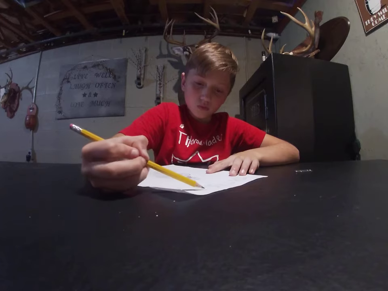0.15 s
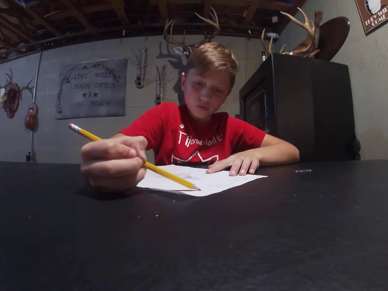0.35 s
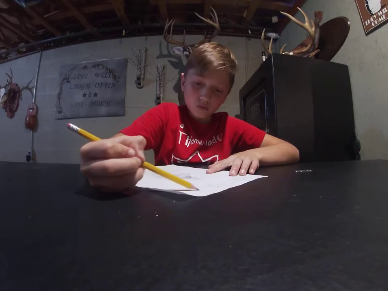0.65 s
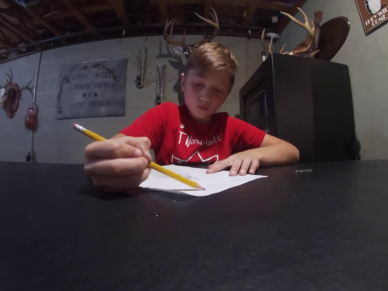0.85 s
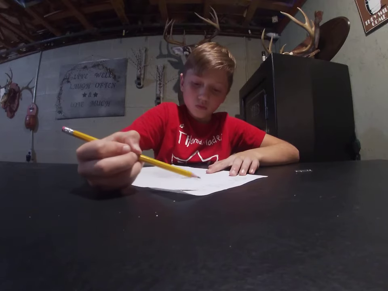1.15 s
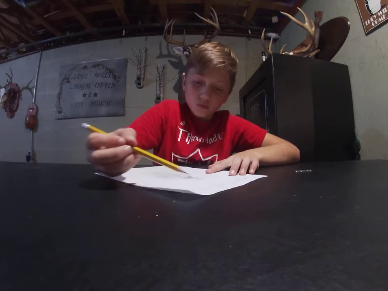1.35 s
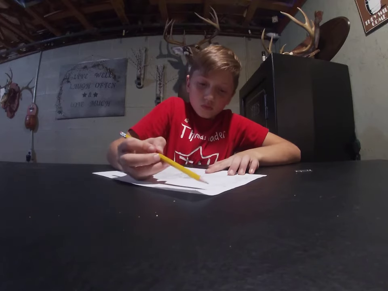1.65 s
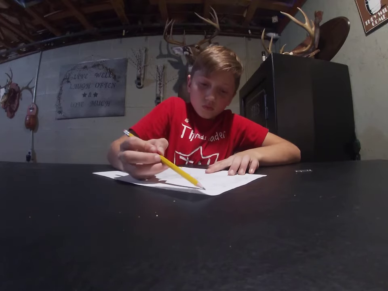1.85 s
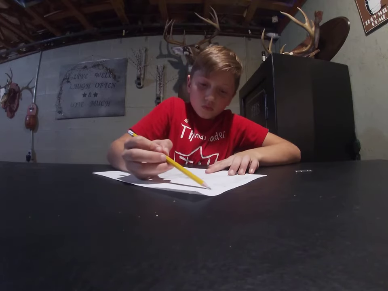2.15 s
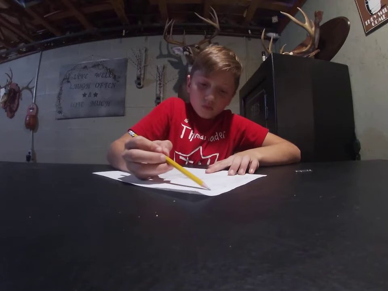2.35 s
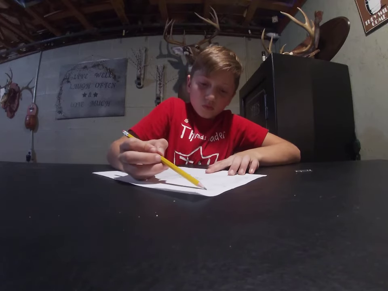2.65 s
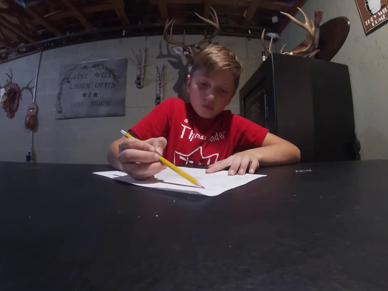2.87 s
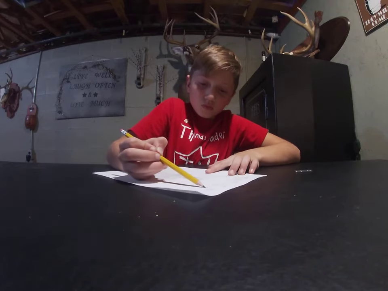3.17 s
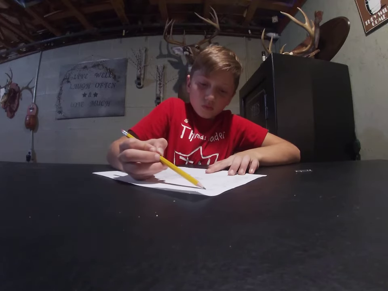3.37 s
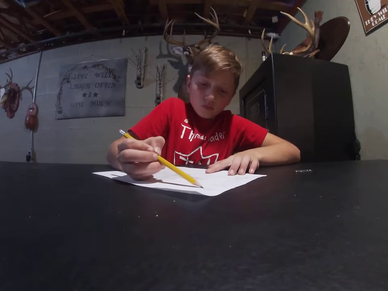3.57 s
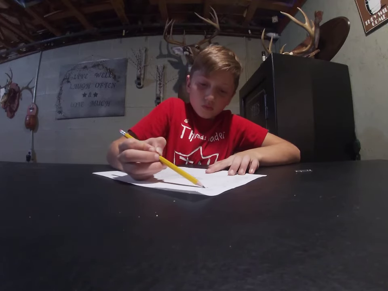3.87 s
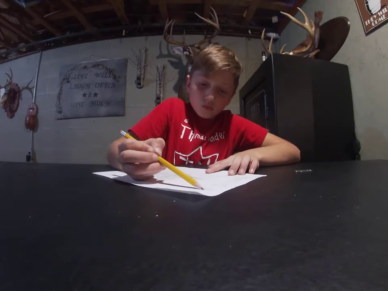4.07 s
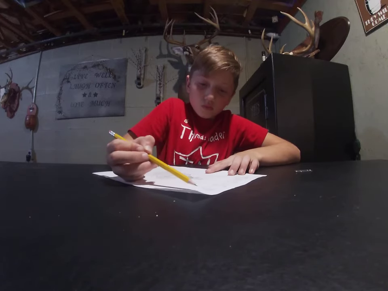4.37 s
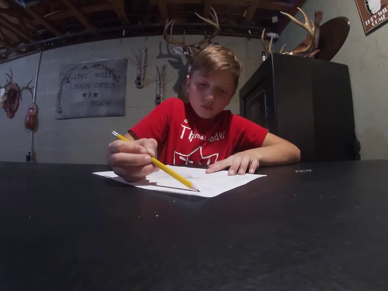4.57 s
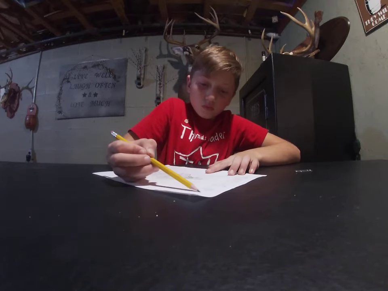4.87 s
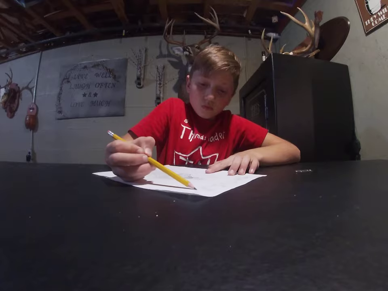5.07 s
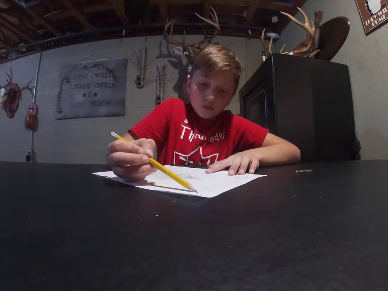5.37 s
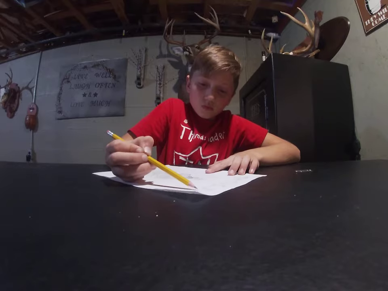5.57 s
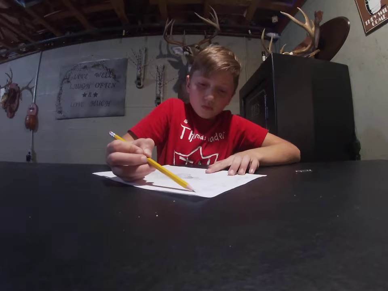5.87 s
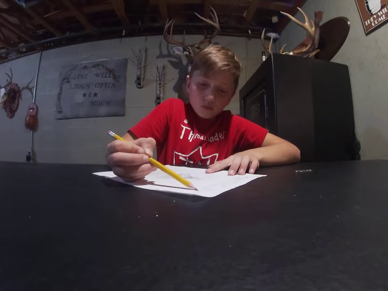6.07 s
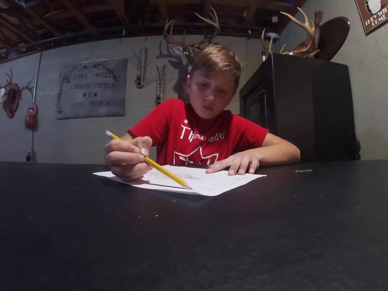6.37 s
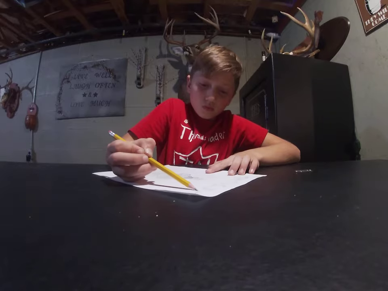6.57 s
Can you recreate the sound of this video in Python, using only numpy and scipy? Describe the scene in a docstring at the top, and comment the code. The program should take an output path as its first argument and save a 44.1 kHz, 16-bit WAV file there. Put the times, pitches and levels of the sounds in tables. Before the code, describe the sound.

Close pencil shading on a sheet of paper: bursts of dry, slightly woody strokes, small taps, a hand rub and deep thumps over ventilation hum.

```python
"""A pencil shades paper on a table, close to a small camera whose microphone stands on the same table top.
Short, dull strokes of a flat lead and a few knocks come first, then the hand sweeps over the sheet at 1.5 s.
From 1.7 s the lead runs on a sharp edge; the hand rubs the paper and bumps the table near 3.8 s, and the sheet
shifts at 4.3 s. More bursts of strokes and a last rub follow. Slips over fibres make the hiss and ring the pencil.
The arm rocks the table now and then, a few faint creaks come and go, and a ventilation fan hums throughout."""
import sys
import numpy as np
from scipy import signal
from scipy.fft import rfft, irfft
from scipy.io import wavfile
from scipy.ndimage import uniform_filter1d

SR = 44100
rng = np.random.default_rng(int(sys.argv[2]) if len(sys.argv) > 2 else 0)


def transcribe(signal):
    """Save signal, clipped to [-1, 1], as a 16-bit WAV file at the path in sys.argv[1]."""
    frames = np.atleast_2d(signal).T
    limited = np.clip(frames, -1, 1)
    pcm = np.round(limited * 32767).astype(np.int16)
    wavfile.write(sys.argv[1], SR, pcm)


N = 296352
TIME = np.arange(N) / SR  # s

# The lead knocks on the table through the sheet.
# Each row: time in seconds, peak of the ring in dB, peak of the tick in dB.
KNOCKS = [(.108, -44.5, -52.5), (0.495, -50.5, -55), (.79, -47, -58), (.8022, -39, -47),
          (1.279, -44.5, -61), (1.291, -46, -55), (1.4412, -47.5, -54), (2.177, -51, -58),
          (2.388, -50, -61), (4.2966, -38, -50), (4.641, -72, -54.5), (5.787, -77, -63)]


def undb(db):
    """Decibels to gain."""
    return 10 ** (np.asarray(db) / 20)


def unit(x):
    """Scale to rms 1."""
    return x / np.sqrt(np.mean(x ** 2))


def colour(x, points):
    """Filter by (Hz, dB) points joined on a log-frequency axis, with steep skirts outside them."""
    hz, db = np.transpose(points)
    f = np.maximum(np.arange(N // 2 + 1) * SR / N, 1)
    skirts = np.minimum(f / hz[0], 1) ** 2 * np.minimum(hz[-1] / f, 1) ** 2
    gain = skirts * undb(np.interp(np.log(f), np.log(hz), db))
    return irfft(rfft(x) * gain, N)


def band(x, low_hz, high_hz, order=2):
    """Band-pass between two frequencies, like a cluster of close, well damped modes."""
    sos = signal.butter(order, sorted([low_hz, high_hz]), "band", fs=SR, output="sos")
    return signal.sosfilt(sos, x + 1e-18)


def walk(rate):
    """Smoothed random steps of rms 1 that change about rate times a second."""
    hold = max(int(SR / rate), 1)
    steps = np.repeat(rng.standard_normal(N // hold + 1), hold)
    return unit(uniform_filter1d(steps, hold)[:N])


def swing(start, length, fastest_share, shape):
    """Speed (0-1) of a move that starts from rest and comes to rest again."""
    fastest = start + length * np.clip(fastest_share, 0, 1)
    progress = np.interp(TIME, [start, fastest, start + length], [0, 1, 0])
    return np.sin(np.pi / 2 * progress) ** shape


def slide(start, length, attack_s, release_s):
    """Speed (0-1) of a slide: it breaks loose, holds, and dies away under friction."""
    attack = np.clip((TIME - start) / attack_s, 0, 1)
    return attack * np.exp(-np.maximum(TIME - start - length, 0) / release_s)


def catches(per_s, spread_db):
    """Tiny slips of one surface over the fibres of another: random clicks of uneven size."""
    hit = rng.random(N) < per_s / SR
    size = rng.standard_normal(N) * undb(spread_db * rng.standard_normal(N))
    return unit(hit * size / np.sqrt(per_s))  # denser clicks are smaller, so the power stays even


def room(x):
    """The arm and chest throw back early echoes; the walls add a short, faint tail."""
    t60_s, tail_db, early_db = 0.41, -18, -7
    age = np.arange(SR // 2) / SR
    tail = rng.standard_normal(len(age)) * undb(-60 * age / t60_s) * (age > .008)
    early = rng.standard_normal(len(age)) * np.exp(-age / 0.0093) * (age > .001)
    response = undb(tail_db) * tail / np.linalg.norm(tail) + undb(early_db) * early / np.linalg.norm(early)
    return x + signal.fftconvolve(x, response)[:N]


def body(force):
    """A force at the lead rings the pencil's shaft and, more broadly, the table top under the sheet."""
    shaft = unit(band(force, 1083, 1300))
    board = unit(band(force, 710, 1710))
    return unit(shaft + undb(-14.5) * board)


def pencil():
    """The hiss and ring swell and fade with the lead's speed; the faster it runs, the more fibres it catches."""
    # Swells of the lead's hiss; a long or uneven stroke may take two or three overlapping rows.
    # Each row: start in seconds, length in seconds, hiss level in dB before the edge and wobble.
    swells = [(0, 0.057, -71.5), (0.097, 0.078, -68.5), (0.321, 0.067, -74.5), (0.402, 0.13, -68),
              (0.556, 0.14, -64.5), (0.701, 0.14, -66.5), (0.844, .15, -66.5), (0.993, .11, -67.5),
              (1.1, 0.095, -72.5), (1.269, 0.34, -75.5), (1.979, 0.097, -70), (2.072, 0.095, -66),
              (2.168, 0.099, -62), (2.273, 0.098, -64.5), (2.369, 0.082, -63.5), (2.46, .085, -65.5),
              (2.727, .07, -77), (2.817, 0.22, -72.5), (2.92, .19, -67), (3.06, .1, -72), (3.191, .17, -76),
              (3.276, 0.26, -68.5), (3.578, 0.32, -68.5), (3.896, 0.22, -69.5), (4.065, .14, -67),
              (4.695, 0.18, -65.5), (4.88, 0.15, -66.5), (5.06, 0.22, -65.5), (5.285, 0.15, -66),
              (5.499, .135, -63), (5.914, 0.16, -77), (6.011, 0.19, -67), (6.207, .3, -76),
              (6.566, .16, -71.5)]
    # Colour of lead on paper. Each row: frequency in Hz, relative density in dB per Hz.
    lead_colour = [(1000, -0.5), (1700, -6), (2600, -4.5), (3500, -8), (4500, -3), (6000, -3), (7400, 0.5),
                   (8400, -6), (9300, -15.5), (11000, -16), (13000, -28.5)]
    fastest_share, swing_shape = .5, 1.39  # where a swell is fullest, how peaked it is
    overlap_s = .015  # each swell reaches this far past both its ends
    ring_db, ring_growth = 1.77, 0.72  # ring over the hiss; the power of the speed it grows with
    press_db_per_doubling, usual_swell_s = 2, 0.2  # longer swells ring harder
    skid_db, skid_s = -71.5, 0.024  # the lead skids on as it lands: level and decay of its hiss
    regrip_s = 1.7  # the lead lies flat until the grip changes, then runs on a sharp edge
    blunt_edge_db, sharp_edge_db, blunt_ring_db = -2.5, 0.5, 4.5
    flat_low_hz, flat_high_hz, flat_db = 5470, 6830, -10.5  # extra hiss of the flat lead
    wobble_db, wobbles_per_s = 0.98, 30  # the fingers press unevenly

    speed, hiss_power, ring_power = np.zeros((3, N))
    for start, length, db in swells:
        swell = swing(start - overlap_s, length + 2 * overlap_s, fastest_share, swing_shape)
        press_db = ring_db + press_db_per_doubling * np.log2(length / usual_swell_s)
        moving = swell > 0
        speed = np.maximum(speed, swell)
        hiss_power[moving] += (swell[moving] * undb(db)) ** 2
        ring_power[moving] += (swell[moving] ** ring_growth * undb(db + press_db)) ** 2
    for start, _, _ in KNOCKS:
        hiss_power += (undb(skid_db) * slide(start, 0, attack_s=.0015, release_s=skid_s)) ** 2

    slips = catches(per_s=3000 + 9000 * speed, spread_db=0.5) * undb(0.87 * walk(150))
    snags = catches(per_s=160, spread_db=2.5) * undb(-10.5)  # now and then a coarser fibre
    scratch = unit(colour(slips + snags, lead_colour))

    blunt = TIME < regrip_s
    edge = undb(np.where(blunt, blunt_edge_db, sharp_edge_db))
    treble_filter = signal.butter(4, 7900, "high", fs=SR, output="sos")
    treble = signal.sosfiltfilt(treble_filter, scratch)  # a sharp edge lifts this part
    flat = blunt * undb(flat_db) * band(scratch, flat_low_hz, flat_high_hz, order=1)
    through_air = room(np.sqrt(hiss_power) * (scratch - treble + edge * treble + flat))
    ring_gain = undb(blunt_ring_db * blunt + 1.5 * walk(50))
    through_table = np.sqrt(ring_power) * body(slips) * ring_gain
    return (through_air + through_table) * undb(wobble_db * walk(wobbles_per_s))


def taps():
    """The lead lands with a tick; paper cushions the blow, so the ring swells and dies in milliseconds."""
    firm_tick_hz, firm_tap_db = 4250, -41  # tick of a knock whose ring peaks at this level
    lighter_db_per_octave = 42  # a lighter knock ticks higher
    tick_s = .0005  # decay
    out, click = np.zeros(N), np.zeros(2048)
    click[0] = 1
    age = np.arange(len(click)) / SR
    ring = band(body(click), 835, 1550)
    for start, ring_db, tick_db in KNOCKS:
        tick_hz = firm_tick_hz * 2 ** ((firm_tap_db - ring_db) / lighter_db_per_octave)
        burst = rng.standard_normal(len(click)) * np.exp(-age / tick_s)
        tick = band(burst, tick_hz / 2, tick_hz * 1.51, order=5)
        at = int(start * SR)
        knock = undb(ring_db) * ring / abs(ring).max() + undb(tick_db) * tick / abs(tick).max()
        out[at:at + len(click)] += knock
    return out


def hand_move(start, length, db):
    """Loudness of the hand on the paper: a short push, then a longer coast."""
    return undb(db) * swing(start, length, fastest_share=0.2, shape=1.5)


def sliding():
    """Paper on the table hisses broadly; skin on paper swishes when quick and rubs softly when slow."""
    # The sheet shifts on the table. Each row: start in seconds, length in seconds, hiss level in dB.
    drags = [(1.242, 0.41, -64), (4.273, 0.098, -66)]
    # The side of the hand rubs the paper slowly. Each row: start in seconds, length in seconds, level in dB.
    rubs = [(3.32, 0.42, -70), (3.76, 0.17, -66), (6.51, 0.33, -66.5)]
    # The hand sweeps quickly across the sheet. One row: start in seconds, length in seconds, level in dB.
    sweep = (1.483, 0.38, -63)
    # Colours of paper on the table, skin rubbing and skin swishing on paper.
    # Each row: frequency in Hz, relative density in dB per Hz.
    sheet_colour = [(900, -1), (1500, -1), (2600, -1), (3400, -2), (4000, -2), (6000, -1), (8000, -1),
                    (9100, -15), (10500, -17.5), (13000, -33)]
    rub_colour = [(500, -7), (850, 2.5), (1150, -1), (1500, 1), (2000, -7.5), (3000, -14.5), (5000, -28)]
    swish_colour = [(700, -3.5), (1300, -6), (1550, 2.5), (1750, 6), (2000, 0), (2400, -4.5), (2900, -13),
                    (4000, -38)]

    drag = np.zeros(N)
    for start, length, db in drags:
        drag += undb(db) * slide(start, length, attack_s=0.25 * length, release_s=0.21 * length)
    sheet = unit(colour(catches(per_s=9000, spread_db=2.0), sheet_colour)) * drag
    grip = catches(per_s=4400, spread_db=3.5) * undb(1.6 * walk(60))
    swish = unit(colour(grip, swish_colour)) * hand_move(*sweep)
    rub = unit(colour(grip, rub_colour)) * sum(hand_move(*move) for move in rubs)
    return room(sheet + swish + rub)


def creaks():
    """Faint creaks and squeaks: narrow bands of noise, unsteady in tone, that swell and fade."""
    # Each row: start in seconds, end in seconds, centre in Hz, width in Hz, level in dB at the fullest.
    creak_rows = [(0.098, 0.352, 292, 46, -54), (4.46, 4.685, 749, 6.8, -67.5), (4.68, 4.924, 792, 29, -73),
                  (6.603, 6.708, 824, 34, -67)]
    out = np.zeros(N)
    for start, end, hz, width, db in creak_rows:
        swell = np.sin(np.pi * np.clip((TIME - start) / (end - start), 0, 1))
        out += undb(db) * swell * unit(band(rng.standard_normal(N), hz - width / 2, hz + width / 2))
    return out


def table():
    """The table sways slowly on its legs under the arm; soft bumps of the hand ring its top."""
    # The arm rocks the table.
    # Each row: strongest moment in seconds, rms level there in dB, width of the dying away in seconds.
    sways = [(.728, -44.5, .04), (1.493, -45, 0.042), (1.872, -49, 0.052), (2.392, -38, 0.038),
             (2.924, -32, .033), (3.29, -35, 0.052), (3.875, -24.5, 0.054), (4.455, -38, 0.062),
             (5.26, -30.5, 0.086), (5.742, -38.5, 0.033), (5.88, -40, .045)]
    # The heel of the hand bumps the table. Each row: time in seconds, level in dB, scaling all modes.
    bumps = [(3.766, -32.5), (3.83, -30), (3.887, -33.5)]
    # Modes of the table top. Each row: frequency in Hz, relative level in dB, 60 dB decay in seconds.
    modes = [(38.8, 0, 0.23), (49.8, -2, 0.41), (63.4, 5.5, 0.19), (69.9, -2, 0.38), (80, -7, 0.09),
             (164, -16, 0.1)]
    sway_hz, rise_share = 26, 0.55  # a sway builds up faster than it dies away
    tremble_db = -70.5  # the table never quite rests under the arm

    out = undb(tremble_db) * unit(band(rng.standard_normal(N), sway_hz / 1.3, sway_hz * 1.2))
    for strongest, db, fall_s in sways:
        near = abs(TIME - strongest) < .3
        age = TIME[near] - strongest
        width = fall_s * np.where(age < 0, rise_share, 1)
        swell = np.exp(-(age / width) ** 2 / 2)
        rocking = np.sin(2 * np.pi * (sway_hz * age + rng.random()))
        out[near] += np.sqrt(2) * undb(db) * swell * rocking

    age = np.arange(SR // 2) / SR
    soft = 1 - np.exp(-age / 0.023)  # flesh pushes gradually
    ring = np.zeros(len(age))
    for hz, mode_db, t60 in modes:
        ring += undb(mode_db - 60 * age / t60) * np.sin(2 * np.pi * hz * age)
    for start, db in bumps:
        at = int(start * SR)
        out[at:at + len(age)] += undb(db) * soft * ring
    return out


def fan():
    """Wavering blade and mains tones over air that rushes through a resonant duct."""
    # Fan and motor tones. Each row: frequency in Hz, rms level in dB before wavering, waver in dB.
    hum = [(59.5, -71, 4.5), (115.4, -86, 5.5), (147.46, -57, 1.5), (197.2, -53, 2.03), (238.4, -69, -4),
           (394.2, -71, 1), (427, -77, 3.5), (453.6, -77, 5), (481.5, -67.5, 1.2), (513, -79, 2.5)]
    # Rushing air. Each row: frequency in Hz, relative density in dB per Hz.
    air_colour = [(20, 6.5), (60, -7), (100, -9.5), (150, 7.5), (200, 4.5), (270, 0.5), (350, -2.5),
                  (500, -4), (570, -11), (900, -15), (1600, -24), (3500, -29), (7600, -29.5), (9300, -39),
                  (13000, -46.5)]
    # Duct resonances. Each row: centre in Hz, width in Hz, rms level in dB.
    resonances = [(225.1, 16.4, -58), (407.8, 29.5, -69)]
    out = np.zeros(N)
    for hz, db, waver_db in hum:
        level = np.sqrt(2) * undb(db + waver_db * walk(7))
        out += level * np.sin(2 * np.pi * (hz * TIME + rng.random()) + 0.13 * walk(4))
    for hz, width, db in resonances:
        out += undb(db) * unit(band(rng.standard_normal(N), hz - width / 2, hz + width / 2))
    air = unit(colour(rng.standard_normal(N), air_colour))
    return out + air * undb(-57.5 + .5 * walk(2.94))


def scene():
    """Pencil, hand, creaks, table and fan reach one microphone."""
    return (pencil() + taps() + sliding() + creaks() + table() + fan())[None]


def record(dry):
    """The camera cuts the top: a steep low-pass at 13.1 kHz."""
    return signal.sosfilt(signal.ellip(8, .2, 70, 13100, fs=SR, output="sos"), dry)


dry = scene()
out = record(dry)
transcribe(out)
```